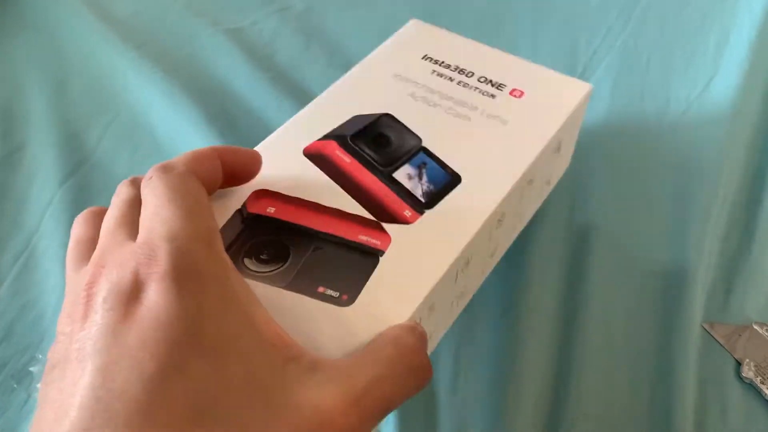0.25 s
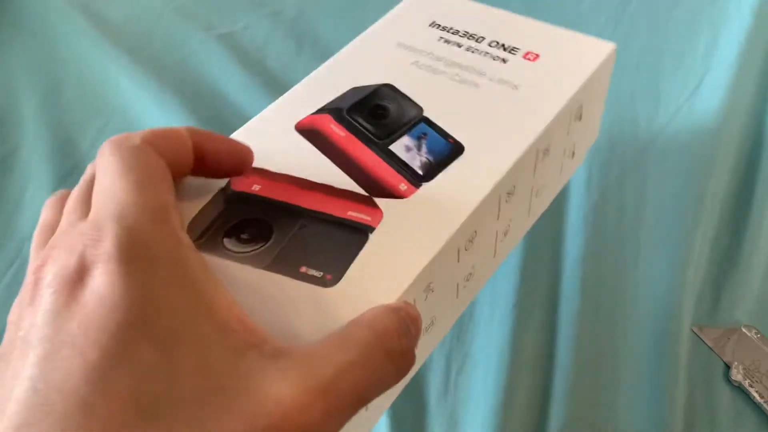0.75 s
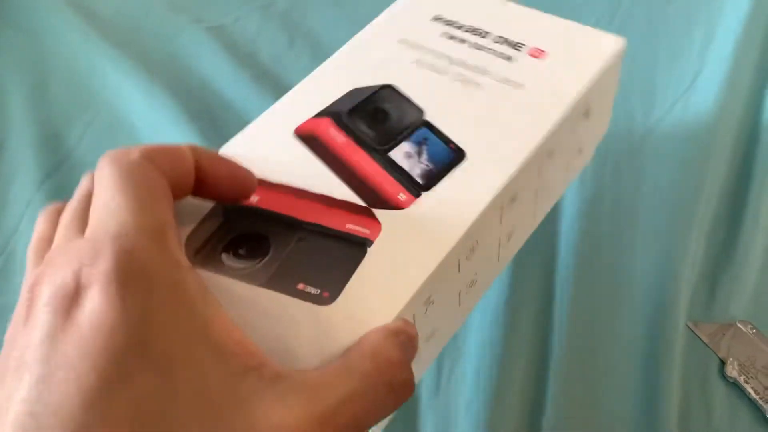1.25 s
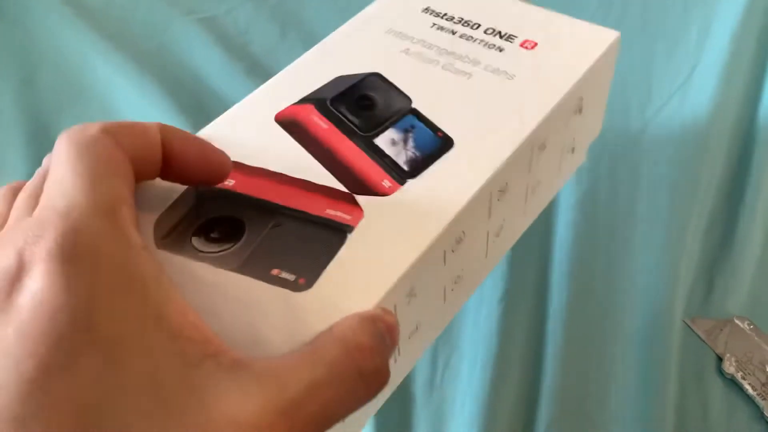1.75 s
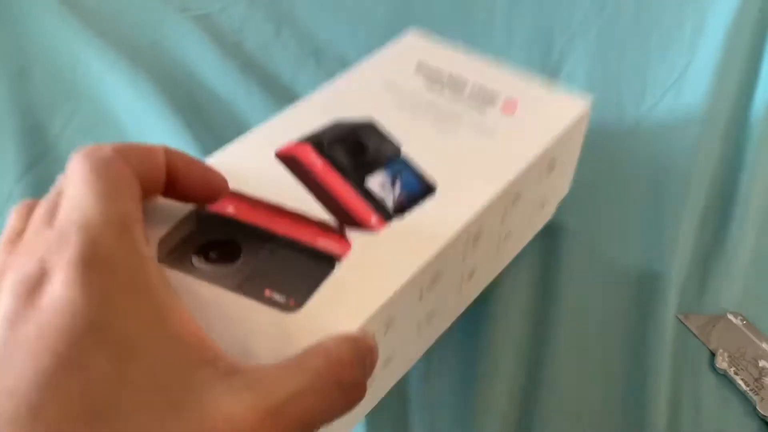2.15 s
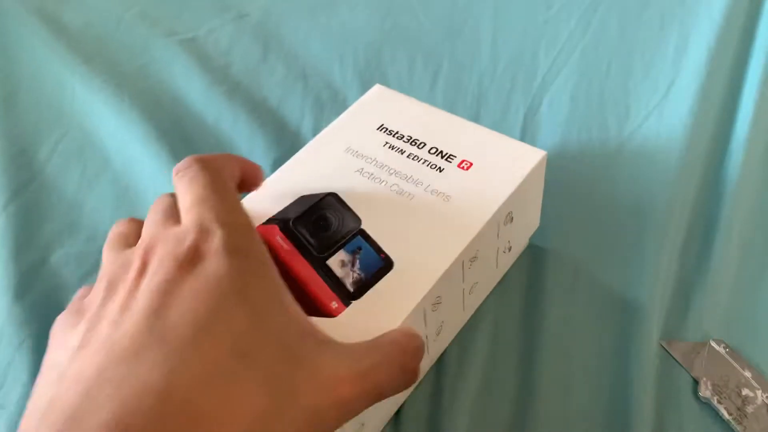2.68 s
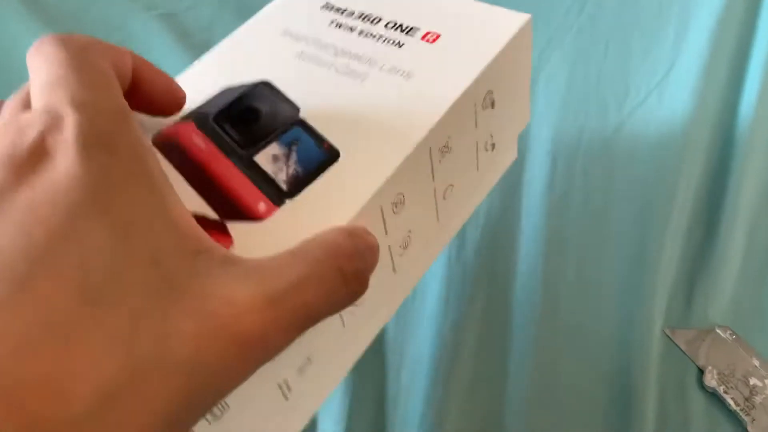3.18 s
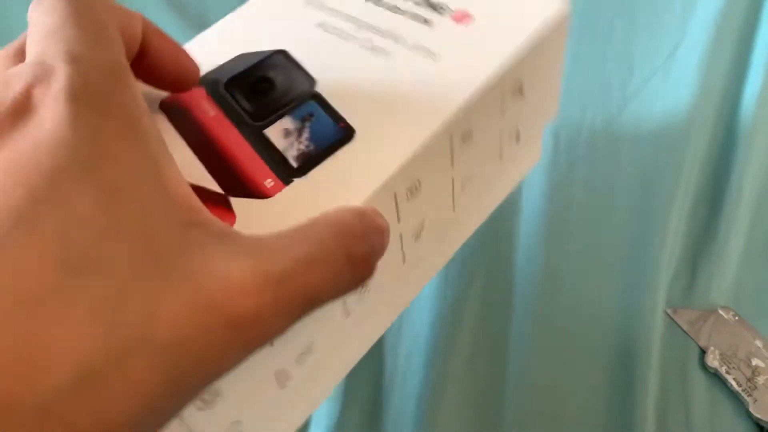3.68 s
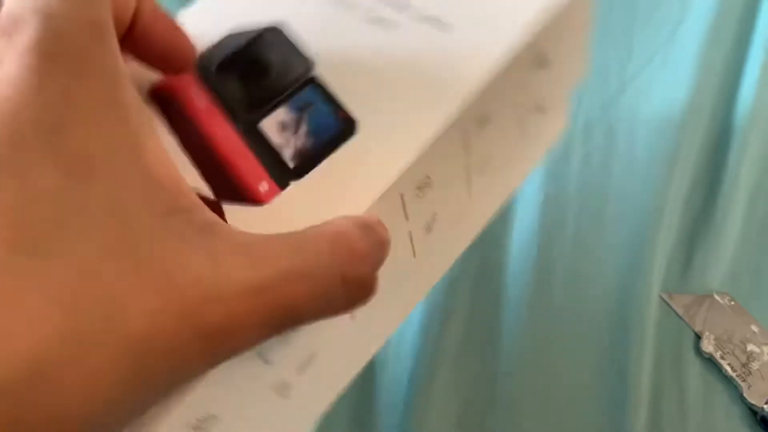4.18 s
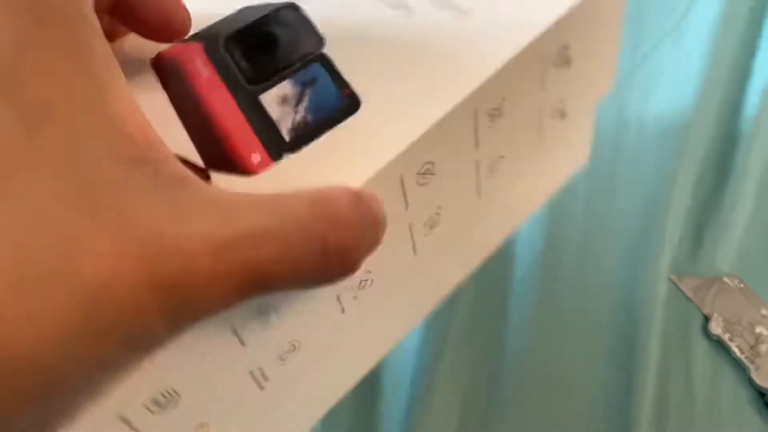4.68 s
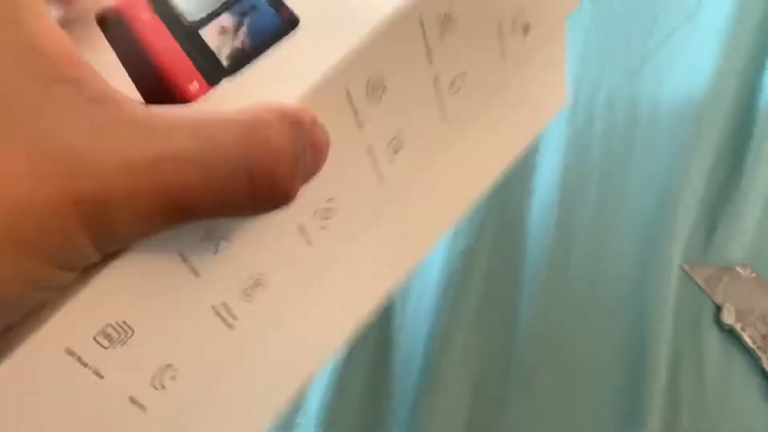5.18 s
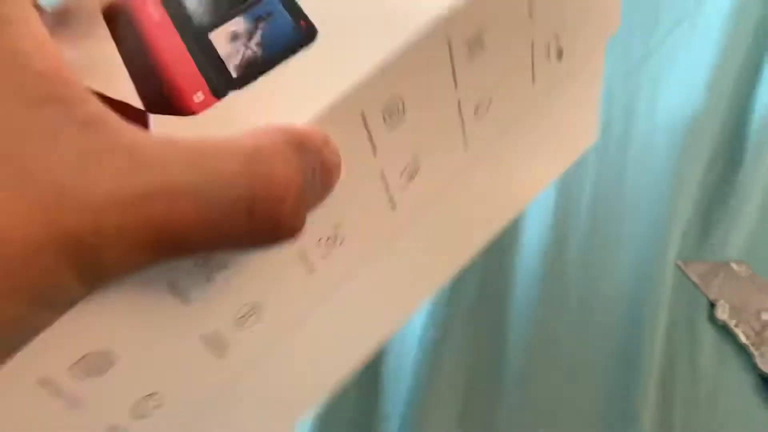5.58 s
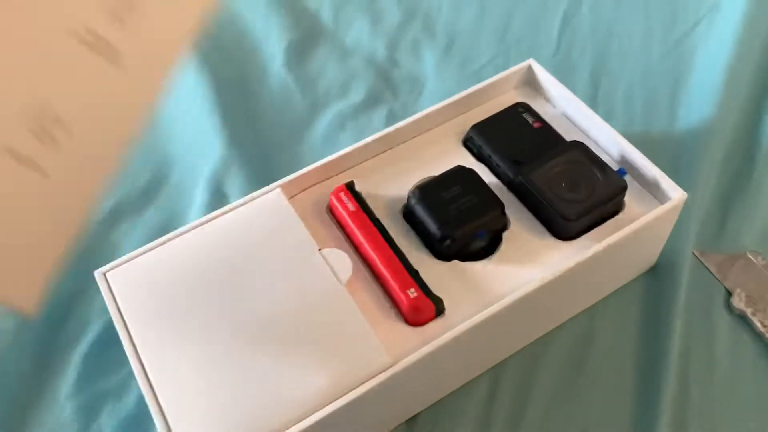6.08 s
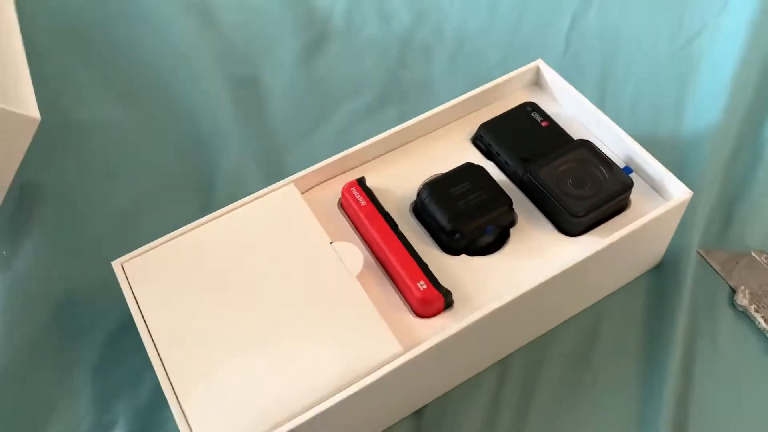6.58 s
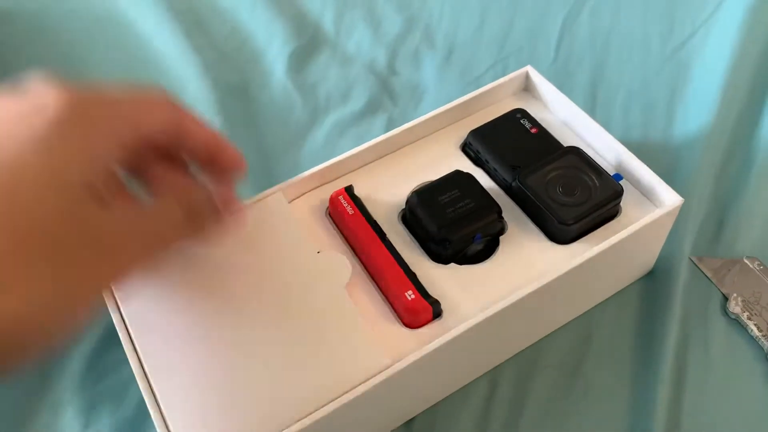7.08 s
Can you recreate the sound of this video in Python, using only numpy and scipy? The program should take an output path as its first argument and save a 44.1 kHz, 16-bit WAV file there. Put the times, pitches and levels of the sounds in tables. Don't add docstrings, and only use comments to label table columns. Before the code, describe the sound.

A quiet furnished room with soft air noise and a faint, low distant motor hum, heard by close stereo microphones. From 0 to 2.3 s a hand gives a stiff cardboard box isolated shakes: dull low thumps and hollow panel knocks near 0.75, 1.05 and strongest at 1.54, then a soft landing on bedding around 2.05. After a lull, from 2.8 s the shaking becomes quick and continuous, with rumbling, card rubbing, dry ticks and corner clicks, strong around 3.84 and 4.05 to 4.2. From 5.3 to 5.8 s the base breaks free in the loudest flurry of boxy knocks, sharp cracks, fast scrapes and short squeaky rubs. It drops abruptly to near quiet with hum. A faint slide near 6.3, a cushioned bounce at 6.5 to 6.65, a crisp tick at 6.96, then airy finger brushing to the end.

```python
import sys
import numpy as np
from scipy import signal
from scipy.fft import rfft, irfft
from scipy.io import wavfile
from scipy.ndimage import uniform_filter1d

SR = 44100
rng = np.random.default_rng(int(sys.argv[2]) if len(sys.argv) > 2 else 0)


def volts(x):
    e = np.asarray(x, float) / 20
    return 10 ** e


def put_to_file(sound):
    columns = np.atleast_2d(sound).T
    safe = np.clip(columns, -1, 1)
    whole_steps = np.round(safe * 32767)
    wavfile.write(sys.argv[1], SR, whole_steps.astype(np.int16))


N = 323870
TIME = np.arange(N) / SR

# (time of the peak [s], peak level [dB], pitch [Hz], length [ms])
BUMP_THUMPS = [(0.759, -29, 193, 8.1), (1.0451, -36, 227, 12), (1.1563, -37.5, 234, 3.3),
               (1.414, -46, 231, 11.6), (1.4976, -44, 180, 9.4), (1.5394, -21, 237, 7.7),
               (1.556, -34.5, 101, 12), (2.0294, -28, 86, 13), (2.0475, -28, 94, 4.4),
               (2.0814, -42, 81, 9.3), (2.2501, -29.5, 99, 9.3), (2.3423, -45, 67, 47),
               (6.4506, -40.5, 124, 4.3), (6.4665, -33.5, 85.7, 16), (6.5772, -35.5, 80, 52),
               (6.9592, -44, 216, 5), (6.555, -40, 250, 6), (6.665, -43, 70, 14), (0.773, -40, 190, 8)]
# (time of the peak [s], peak level [dB], pitch [Hz], length [ms])
SHAKE_THUMPS = [(2.803, -45.5, 133, 9.1), (2.922, -38, 130, 14), (2.9995, -44, 98, 16),
                (3.107, -42, 110, 8), (3.1247, -42, 119, 8), (3.27, -46, 100, 10), (2.855, -42, 150, 10),
                (4.12, -30, 130, 8), (4.222, -33, 130, 8), (3.1663, -40, 177, 6), (3.231, -39.5, 140, 9.6),
                (3.3933, -45, 141, 31), (3.4364, -44, 140, 8), (3.6741, -35.5, 127, 14),
                (3.7813, -33, 137, 9), (3.7985, -42, 138, 5.4), (3.8382, -24, 264, 7.1),
                (3.878, -37, 184, 13), (3.961, -32, 137, 7.7), (4.006, -32, 138, 14),
                (4.0703, -22, 197, 5.5), (4.1048, -22, 190, 4.8), (4.2106, -20.5, 161, 7.2),
                (4.2694, -34, 225, 5.3), (4.37, -43, 100, 11), (4.461, -28, 150, 9), (4.48, -39, 135, 19),
                (4.5334, -39.5, 246, 4.9), (4.7393, -34.5, 242, 3.8), (4.903, -40.5, 172, 7.8),
                (5.0501, -36.5, 206, 3.6), (5.0876, -39, 164, 6.7), (5.1686, -39.5, 200, 2.6)]
# (time of the peak [s], peak level [dB], pitch [Hz], length [ms])
DROP_THUMPS = [(5.2483, -34.5, 162.5, 2.6), (5.3061, -35.5, 245, 7.6), (5.3376, -26, 130, 5.9),
               (5.4552, -20, 242, 8.1), (5.4712, -25, 200, 14), (5.5138, -24.5, 237, 10),
               (5.5434, -27, 195, 4.4), (5.566, -29.5, 157, 15), (5.5804, -25, 86.5, 8.8),
               (5.611, -24, 242, 6), (5.6774, -32, 176, 2.7), (5.7016, -23.5, 113, 13.3),
               (5.7717, -29, 146, 7.4)]
# (time [s], peak level [dB], loudest pitch [Hz])
PANEL_KNOCKS = [(0.405, -49.5, 795), (0.749, -40, 780), (1.036, -32.5, 672), (1.14, -35, 651),
                (1.283, -49.5, 432), (1.405, -45, 377), (1.536, -29, 700), (2.036, -43.5, 443),
                (2.886, -54, 484), (3.152, -47, 470), (3.539, -45.5, 460), (3.66, -37, 636),
                (3.765, -45.5, 805), (3.835, -26, 480), (4.044, -40.5, 432), (4.077, -35, 390),
                (4.096, -28.5, 632), (4.2, -31, 450), (4.266, -43, 447), (4.45, -38.5, 690),
                (4.733, -41.5, 375), (4.897, -45, 647), (5.045, -46, 563), (5.285, -46, 392),
                (5.445, -20, 486), (5.508, -25, 434), (5.562, -30, 637), (5.607, -31.5, 525),
                (5.678, -34, 706), (5.758, -40, 628), (1.468, -56, 500), (3.868, -44, 600), (4.6, -52, 600),
                (4.716, -51, 650), (4.878, -50, 400), (5.524, -30, 700), (5.535, -33, 600),
                (6.553, -50, 480), (6.957, -53, 720), (7.19, -55, 750), (7.222, -54, 500),
                (2.853, -50, 600), (2.91, -48, 550)]
# (pitch [Hz], width [Hz], level [dB])
PANEL_TONES = [(421.6, 106, 1), (495.6, 105, -1.5), (597.6, 106, 2), (680.7, 68, 1.5), (770, 78, 1),
               (907, 280, -10), (1150, 300, -7)]
# (pitch [Hz], level [dB per Hz])
SCRAPE_COLOUR = [(410, -45), (700, -9), (934, -4.5), (1250, 0), (2570, -5.5), (4080, -9), (5640, -16.5),
                 (8840, -21), (11000, -33.5), (14300, -52), (22000, -120)]
# (pitch [Hz], level [dB per Hz])
BRUSH_COLOUR = [(1470, -40.5), (2500, -9.5), (9030, 0), (10700, -4), (11500, -3.5), (12800, 2),
                (15700, -13)]
AIR_DB = -72


def evened(x):
    return x / np.sqrt(np.mean(x ** 2) + 1e-20)


def read(points, hz):
    f, value = np.transpose(points)
    return np.interp(np.log(hz + 1), np.log(f + 1), value)


def over_time(points):
    return np.interp(TIME, *np.transpose(points))


def add(mix, s, sound):
    part = mix[max(round(s * SR), 0):][:len(sound)]
    part += sound[:len(part)]


def coloured(x, spectrum):
    gain = volts(read(spectrum, np.fft.rfftfreq(len(x), 1 / SR)))
    return evened(irfft(rfft(x) * gain, len(x)))


def resonate(x, hz, width):
    return signal.lfilter(*signal.iirpeak(hz, hz / width, SR), x)


def slips(per_s, spread_db, smooth):
    draw, size, noise = rng.random(N), rng.exponential(1, N), rng.standard_normal(N)
    catches = (draw < per_s / SR) * volts(spread_db * np.minimum(size, 4)) * np.sign(noise)
    return evened(evened(catches) + smooth * rng.standard_normal(N))


def flutter(per_s, depth_db):
    count = int(N / SR * per_s) + 2
    steps = rng.standard_normal(400)[:count]
    return volts(depth_db * np.interp(np.arange(N), np.linspace(0, N, count), steps))


def swells(rows):
    out = np.zeros((2, N))
    for s, db, ms, other_db in rows:
        near = abs(TIME - s) < ms / 500
        bell = np.exp(-((TIME[near] - s) / (ms / 2000)) ** 2)
        out[:, near] += volts([[db], [db + other_db]]) * bell
    return out


def after(blows, share, offset_db, rise_s, fade_s):
    t, out = np.arange(-.06, .3, 1 / SR), np.zeros(N)
    shape = np.where(t < 0, np.exp(-(t / rise_s) ** 2), np.exp(-abs(t) / fade_s))
    for s, db, *_ in blows:
        add(out, s + t[0], volts(share * db + offset_db) * shape)
    return out


def air():
    # (pitch [Hz], level [dB per Hz])
    air_colour = [(12, -36), (28, -17), (50, -8), (141, -11), (186, -13), (250, -13), (330, -25),
                  (385, -30), (800, -29), (1210, -34), (4480, -37), (7190, -42.5), (9240, -33.5),
                  (10600, -41), (11600, -33.5), (14000, -45), (15700, -41.5)]
    return [coloured(rng.standard_normal(N), air_colour) for _ in range(3)]


def hum():
    # (time [s], rms level [dB])
    loudness = [
        (0, -67.5),
        (1.2, -68),
        (1.9, -85),
        (5.7, -78),
        (5.9, -67),
        (6.8, -70),
        (6.999, -91),
    ]
    # (time [s], pitch [Hz])
    pitch = [
        (0, 179),
        (0.5, 185),
        (1.2, 187),
        (5.9, 190),
        (7, 191),
    ]
    turns = np.cumsum(over_time(pitch) * flutter(3, .05)) / SR
    tone = np.sqrt(2) * np.sin(2 * np.pi * turns)
    return volts(over_time(loudness)) * tone * flutter(7.4, 1.4)


def room(x):
    # (pitch [Hz], time [s])
    echo_time = [(100, 0.21), (800, 0.27), (4000, 0.24), (12000, 0.061)]
    hz, t, z = signal.stft(rng.standard_normal((2, SR // 2)), SR, nperseg=256)
    fade = volts(-60 * t / read(echo_time, hz)[:, None])
    tail = signal.istft(z * fade, SR, nperseg=256)[1]
    tail = np.pad(tail, ((0, 0), (150, 0)))
    return signal.fftconvolve(x[None], tail / np.linalg.norm(tail[0]), axes=1)[:, :N]


def bounces():
    # (time [s], level [dB], pitch [Hz], time to fall by 60 dB [s])
    mattress = [
        (2.06, -45.5, 75.4, 0.36),
        (2.268, -48.5, 67.5, 0.64),
        (6.48, -50, 86, 0.26),
        (6.6, -42, 68, 0.47),
        (5.86, -58, 118, 0.5),
    ]
    out, t = np.zeros(N), np.arange(SR // 3) / SR
    soft_ends = signal.windows.tukey(len(t), .15)
    for s, db, hz, t60 in mattress:
        add(out, s, volts(db - 60 * t / t60) * np.sin(2 * np.pi * hz * t) * soft_ends)
    return out * flutter(17, 1.9)


def singing():
    # (time of the middle [s], rms level [dB], length [ms], pitch [Hz])
    sung_notes = [(0.76, -76, 50, 3000), (1.05, -62, 25, 1750), (1.54, -66, 25, 1750),
                  (3.2, -77, 130, 4200), (3.105, -78, 50, 2400), (4.505, -76, 30, 4200),
                  (3.56, -75, 60, 4100), (5.285, -67, 55, 4100), (4.6, -76, 70, 4200), (4.8, -68, 50, 4300),
                  (4.89, -70, 80, 4100), (5.665, -54, 20, 3600), (5.72, -47, 60, 740), (5.57, -42, 30, 700),
                  (5.73, -56, 40, 1450), (6.31, -78, 130, 3120), (6.3, -84, 120, 4390),
                  (6.585, -58, 30, 1920), (6.58, -68, 40, 2590), (6.49, -76, 50, 2500),
                  (6.75, -79, 90, 3030), (6.75, -80, 90, 2370)]
    out, t = np.zeros(N), np.arange(-.15, .15, 1 / SR)
    for s, db, ms, hz in sung_notes:
        width = .14 * hz
        drive = rng.standard_normal(len(t)) * volts(3.0 * rng.exponential(1, len(t)))
        ring = evened(resonate(resonate(drive, hz, width), hz, width))
        add(out, s + t[0], volts(db) * ring * np.exp(-(t / (ms / 2000)) ** 2))
    return out


def wipes():
    # (time of the middle [s], rms level [dB], length [ms], brightness [dB])
    quick_wipes = [(1.49, -64.5, 41, -24), (2.46, -64, 227, -9), (2.914, -59.5, 30, -12),
                   (3.22, -67, 76, -12), (3.68, -64, 60, -15), (1.4, -70, 60, -20), (3.1, -67, 40, -18),
                   (3.44, -67, 70, -18), (3.8, -63, 40, -18), (3.89, -64, 60, -15), (4.0, -62, 60, -15),
                   (4.09, -58, 90, -11), (4.25, -64, 80, -15), (4.36, -64, 60, -15), (4.5, -66, 70, -15),
                   (6.32, -80, 290, 5), (6.75, -76, 120, -10), (4.808, -55.5, 36, -19),
                   (4.895, -62, 43, -7), (4.965, -59, 37, -22), (5.354, -51.5, 39, -1),
                   (5.44, -47.5, 25, -8.5), (5.51, -46.5, 13, 4), (5.527, -45.5, 9, 9), (5.574, -52, 15, 4),
                   (5.608, -44.5, 17.6, 6.5), (5.671, -48, 26, 4), (5.688, -34.5, 9.4, 4)]
    dull = coloured(slips(1600, 4.1, 1.65), SCRAPE_COLOUR)
    bright = coloured(slips(1800, 3, 3.8), BRUSH_COLOUR)
    bright = signal.lfilter(*signal.butter(2, 9500, fs=SR), bright)
    slow, fast = swells(quick_wipes)
    return slow * dull + fast * bright


def rubbing():
    # (time [s], shaking level [dB], sliding level [dB])
    hand = [(0.0, -75.5, -99), (0.9, -74.5, -96), (1.1, -64.5, -86.5), (1.55, -60.5, -81),
            (1.87, -74, -100), (2.72, -70, -89.5), (2.82, -58.5, -70), (3.3, -57.5, -75), (3.6, -57, -71),
            (4.1, -52, -68), (4.42, -56, -73), (5.11, -58, -77.5), (5.3, -51, -63), (5.54, -43, -55.5),
            (5.72, -50, -65), (5.95, -69, -93), (6.9, -75.5, -78.5), (7.05, -63.5, -73)]
    turn_times = [3.07, 3.33, 3.6, 3.74, 4.43, 4.56, 4.68, 4.775, 5.01, 5.14, 5.4, 5.49, 5.595, 5.645]
    # (time of the middle [s], rumble level [dB], length [ms], panels relative to it [dB])
    nudges = [(0.42, -58, 100, -6), (0.77, -56, 75, -9), (2.25, -58, 60, -8), (2.64, -65, 80, -2),
              (2.89, -53, 99, -10), (3.68, -48.5, 41, -17), (3.4, -58, 90, -2), (1.75, -75, 200, 3),
              (3.99, -52, 60, -1), (4.102, -34, 37, -20), (4.48, -48, 55, -12), (5.541, -36, 73, -10),
              (5.691, -42, 45, -12), (5.92, -66, 80, -30), (6.572, -46, 90, -22), (6.978, -59, 54, -11),
              (7.211, -61, 92, -3.5)]
    # (time of the middle [s], rms level [dB], length [ms], card edge relative to
    # it [dB])
    skin_brushes = [(2.05, -67.5, 66, -0.5), (2.24, -67, 71, -3), (2.52, -76.5, 235, -1),
                    (3.56, -74, 60, 8), (5.541, -54.5, 83, -0.5), (6.49, -66.5, 65, -7.5),
                    (6.568, -56.5, 80, -12), (6.978, -55, 42, -8), (7.06, -55.5, 124, -17),
                    (7.2, -55, 144, -15), (7.34, -55.5, 47, -11)]
    # (pitch [Hz], level [dB per Hz])
    rumble_colour = [(15, -66), (25, -5.5), (55, 8), (97, 8), (190, 4), (292, 0), (404, -22), (500, -21),
                     (650, -57), (1100, -120)]

    rest_db, rest_s = -5, .02
    pause_db = sum(rest_db * np.exp(-((TIME - turn) / rest_s) ** 2) for turn in turn_times)
    s, shaking_db, sliding_db = np.transpose(hand)
    shaking = np.interp(TIME, s, shaking_db) + pause_db
    sliding = np.interp(TIME, s, sliding_db) + pause_db

    (box, panel), (skin, edge) = swells(nudges), swells(skin_brushes)
    thump_rows = BUMP_THUMPS + SHAKE_THUMPS + DROP_THUMPS
    box = box + volts(shaking) + after(thump_rows, share=0.76, offset_db=-33.5, rise_s=0.01, fade_s=0.0365)

    lid_off_s, let_go_s, lid_off_db = 5.76, .07, -12
    off_db = lid_off_db * np.clip((TIME - lid_off_s) / let_go_s, 0, 1)
    moved = volts(-6.5 + 0.76 * shaking + (1 - 0.76) * sliding)
    buzz = after(PANEL_KNOCKS, share=1, offset_db=-33, rise_s=0.03, fade_s=0.08)
    panel = panel + volts(off_db) * (moved + buzz)

    chafe = after(PANEL_KNOCKS, share=0.94, offset_db=-51.5, rise_s=0.022, fade_s=0.022)
    snap = after(PANEL_KNOCKS, share=.8, offset_db=-41, rise_s=.006, fade_s=.012)
    edge = edge + volts(sliding) + chafe + snap
    skin = skin + volts(-46 + .55 * sliding)

    pressure = flutter(45, 2.2)
    soft = signal.butter(2, 2000, fs=SR, output="sos")
    drive = signal.sosfilt(soft, slips(500, 2.6, 0.95))
    panels = evened(sum(volts(g) * resonate(resonate(drive, f, 2 * w), f, 2 * w) for f, w, g in PANEL_TONES))
    rumble = box * coloured(slips(300, 2.4, 1.2), rumble_colour)
    scrape = edge * coloured(slips(1600, 3.2, 0.7), SCRAPE_COLOUR) * pressure
    brush = skin * coloured(slips(4000, 2, 1.5), BRUSH_COLOUR) * np.sqrt(pressure)
    return rumble + panel * panels * pressure + scrape + brush


def clicks():
    # (time [s], peak level [dB], pitch [Hz])
    corner_clicks = [(0.7492, -60, 1100), (1.0366, -49, 1750), (1.0372, -58, 4000), (1.1403, -45, 1300),
                     (1.4786, -55, 1200), (1.5324, -54, 4300), (1.569, -64, 4500), (2.0123, -63, 1200),
                     (2.8062, -62, 1980), (2.9673, -59, 2570), (3.0901, -60, 2610), (3.1495, -51, 2050),
                     (3.4368, -59, 1520), (3.4931, -48, 3100), (3.6238, -50, 1250), (3.834, -38, 1150),
                     (3.8335, -50, 3000), (3.9436, -48, 1200), (3.945, -50, 4700), (4.097, -46, 1200),
                     (4.2005, -42, 950), (4.2655, -54, 1100), (4.4505, -44, 950), (4.5722, -40, 2600),
                     (4.604, -60, 4500), (4.62, -58, 4800), (4.7184, -58, 1230), (4.9518, -55, 1420),
                     (5.0336, -59, 1270), (5.1494, -63, 1560), (5.2681, -55, 1280), (5.4455, -36, 2400),
                     (5.524, -41, 2100), (5.537, -39, 3300), (5.674, -42, 1800), (5.7585, -39, 900),
                     (5.786, -54, 2300), (6.547, -58, 2400), (6.649, -54, 1200), (6.6495, -58, 2800),
                     (3.625, -52, 2900), (3.626, -56, 4300), (4.9, -52, 1200), (4.0607, -39, 2850),
                     (6.9575, -54, 1000), (6.958, -48, 3100)]
    contact_s = .0005
    out, t = np.zeros(N), np.arange(600) / SR
    dull = signal.butter(2, 6500, fs=SR)
    for s, db, hz in corner_clicks:
        crack = rng.standard_normal(len(t)) * (t / contact_s) * np.exp(-t / contact_s)
        width = .36 * hz
        body = resonate(resonate(crack, hz, width), hz, 1.5 * width)
        wider = signal.lfilter(*dull, resonate(crack, 1.9 * hz, 1.5 * hz))
        click = evened(body) + .2 * evened(wider)
        add(out, s - .001, volts(db) * click / abs(click).max())
    return out


def ticks():
    # (time [s], peak level [dB], pitch [Hz], brightness [dB])
    edge_ticks = [(1.038, -51.5, 1700, -39), (0.405, -62, 3100, -30), (1.5329, -46, 1600, -41),
                  (2.0318, -50, 3060, -28), (2.8479, -53, 1500, -31), (2.9035, -51, 2770, -27),
                  (3.1494, -50, 4400, -14), (3.3734, -49.5, 1840, -8), (3.624, -60, 5500, 4),
                  (3.766, -52, 1600, -27), (3.8267, -35, 4300, -40), (3.9435, -41, 2350, -34),
                  (4.0605, -42.5, 2800, -29), (4.1999, -54, 1570, -20), (4.4528, -52.5, 1930, -21),
                  (4.5715, -54, 4900, 17), (4.787, -50, 2190, -10), (5.3288, -50, 5400, -20),
                  (5.444, -27.5, 1690, -22), (5.5034, -46, 1570, -18), (5.5218, -34.5, 2240, -7),
                  (5.5623, -40, 2150, -42), (5.6037, -38, 2330, -34.5), (5.6655, -46, 2090, -15),
                  (5.688, -27, 1610, -20), (5.7578, -45, 2600, -35), (6.5455, -50, 8500, 9),
                  (6.6486, -53, 4000, 5), (6.9564, -37, 2020, 2)]
    out, t = np.zeros(N), np.arange(1500) / SR
    high = signal.butter(2, [6000, 13000], "band", fs=SR)
    for s, db, hz, bright_db in edge_ticks:
        crack = rng.standard_normal(len(t)) * np.exp(-t / 0.0032) * np.minimum(t / 0.0038, 1) ** 2
        edge = resonate(crack, hz, 850) + 0.17 * resonate(crack, 1.59 * hz, 1900)
        spray = signal.lfilter(*high, crack)
        tick = edge / abs(edge).max() + volts(bright_db - 13) * spray / abs(spray).max()
        add(out, s - .002, volts(db) * tick)
    return out


def knocks():
    out, t = np.zeros(N), np.arange(3000) / SR
    soft = signal.butter(3, 1300, fs=SR, output="sos")
    for s, db, hz in PANEL_KNOCKS:
        burst = rng.standard_normal(len(t)) * np.exp(-t / 0.0068) * np.minimum(t / 0.0028, 1)
        blow = signal.sosfilt(soft, burst)
        detune = rng.uniform(0.93, 1.0, len(PANEL_TONES))
        ring = sum(volts(g) * resonate(blow, f * d, w) for (f, w, g), d in zip(PANEL_TONES, detune))
        sweep_hz = hz * (0.563 + 1.029 * np.exp(-t / 0.0065))
        sweep = np.sin(2 * np.pi * np.cumsum(sweep_hz) / SR) * (t / 0.0038) * np.exp(1 - t / 0.0035)
        knock = 0.85 * ring / abs(ring).max() + sweep
        add(out, s - .001, volts(db) * knock / abs(knock).max())
    return out


def thumps():
    out, t = np.zeros(N), np.arange(-.03, .09, 1 / SR)
    for s, db, hz, ms in BUMP_THUMPS + SHAKE_THUMPS + DROP_THUMPS:
        rise, fall = .38 * ms / 1000, .72 * ms / 1000
        shape = np.where(t < 0, np.exp(-(t / rise) ** 2), np.exp(-(abs(t) / fall) ** 1.6))
        turns = hz * (t - 6.0 * t * np.minimum(abs(t), .03))
        add(out, s - .03, volts(db) * shape * np.cos(2 * np.pi * (turns + rng.random())))
    return out


def ports(x):
    # (pitch [Hz], phase [radians])
    left_lead = [(0, 0.2), (125, 0.25), (400, 0.5), (1210, 1.9), (2670, 7.45), (4220, 12.24), (6120, 17.8),
                 (7490, 15.15), (9990, 12.23), (12300, 9), (13200, 7.9), (15400, 5.1)]
    # (pitch [Hz], phase [radians])
    lead_drift = [(100, 0.088), (500, 0.33), (1500, 1.77), (3300, 1.52), (9000, 0.99)]
    hz, _, z = signal.stft(x, SR, nperseg=512, noverlap=384)
    patches = uniform_filter1d(rng.standard_normal(z.shape), 5, 0)
    patches = evened(uniform_filter1d(patches, 14, 1))
    gap = np.interp(hz, *np.transpose(left_lead))[:, None] + read(lead_drift, hz)[:, None] * patches
    both = np.array([z, z * np.exp(-1j * gap)])
    return signal.istft(both, SR, nperseg=512, noverlap=384)[1][:, :N]


def scene():
    box = bounces() + singing() + wipes() + rubbing() + clicks() + ticks() + knocks() + thumps()
    middle, left, right = air()
    wide = 0.99 * volts(AIR_DB) * np.array([left, right]) + volts(-11.5) * room(box)
    low_pass = signal.butter(2, 350, fs=SR, output="sos")
    bass = signal.sosfiltfilt(low_pass, wide - wide.mean(0))
    return ports(box + hum() + 0.52 * volts(AIR_DB) * middle) + wide - bass


def top_cut(x):
    return signal.sosfilt(signal.butter(12, 15850, fs=SR, output="sos"), x)


def record(dry):
    # (pitch [Hz], level [dB])
    treble_response = [(10850, 1), (11050, -15), (12100, -17.5), (12300, 1), (15780, 1.5), (15900, -85)]
    gain = volts(read(treble_response, np.fft.rfftfreq(N, 1 / SR)))
    mix = irfft(rfft(dry) * gain, N)
    return top_cut(mix)


dry = scene()
out = record(dry)
put_to_file(out)
```